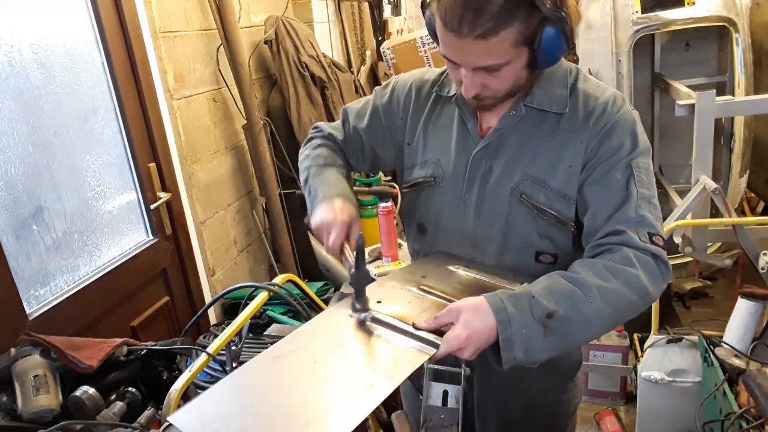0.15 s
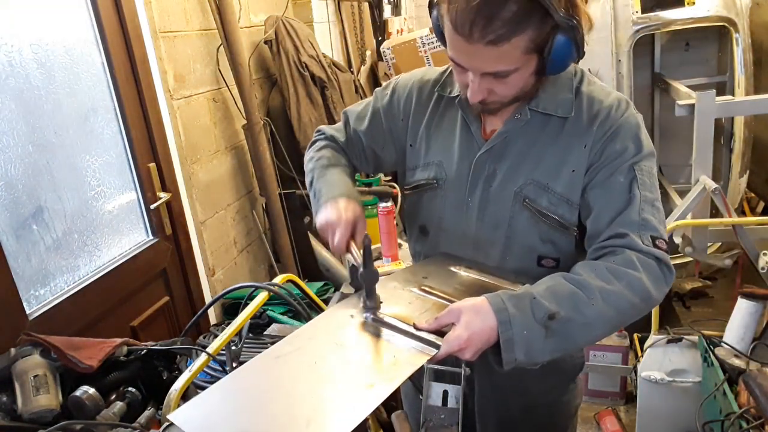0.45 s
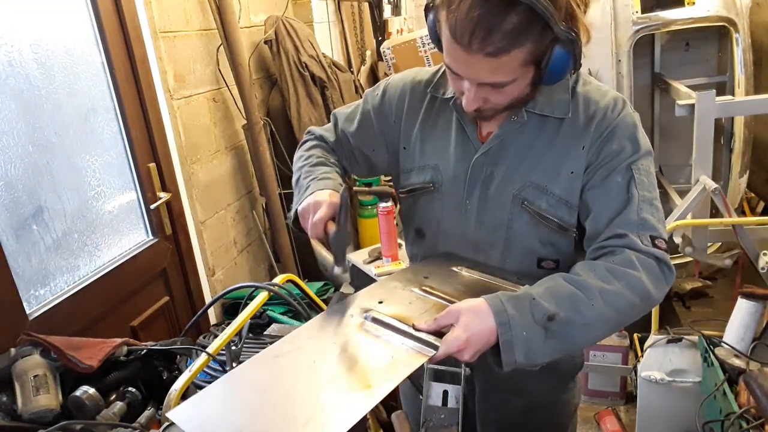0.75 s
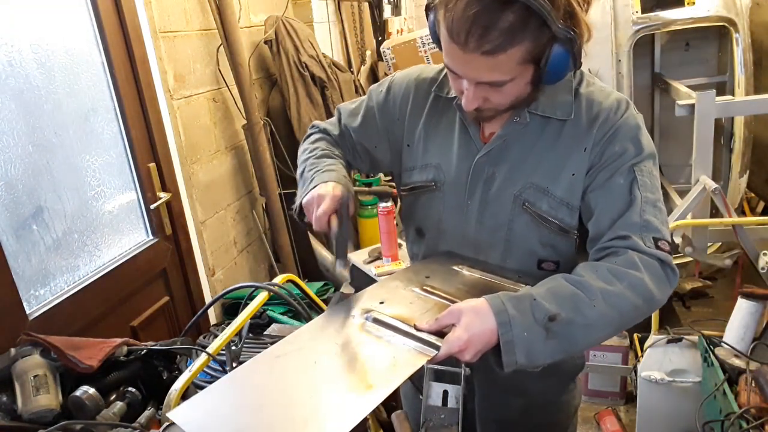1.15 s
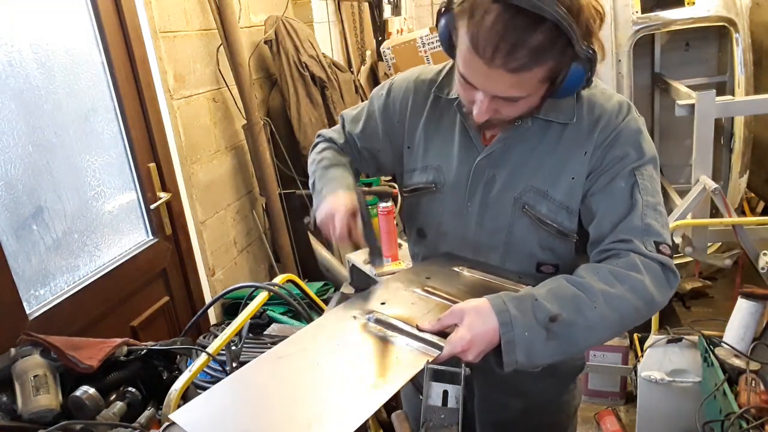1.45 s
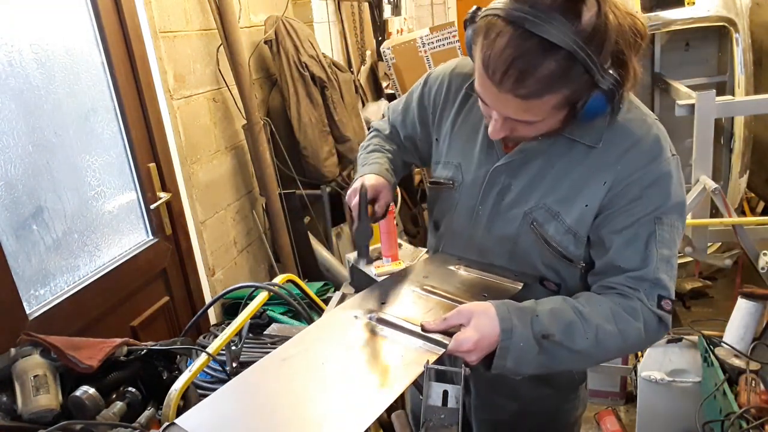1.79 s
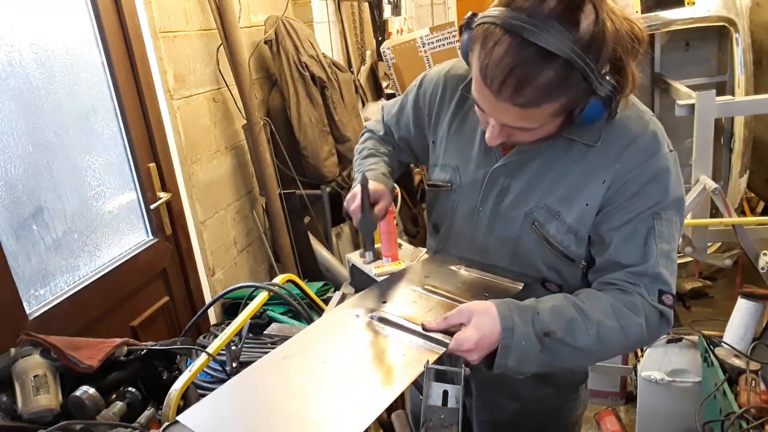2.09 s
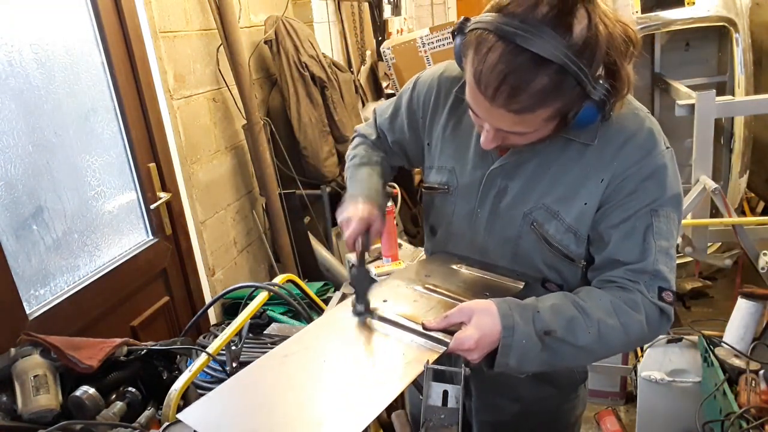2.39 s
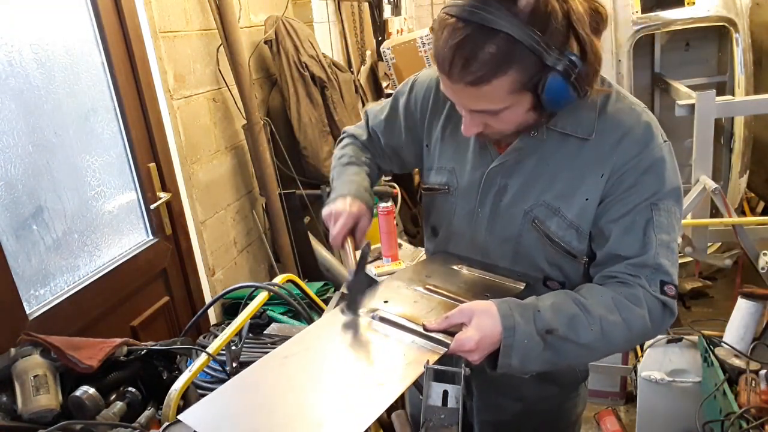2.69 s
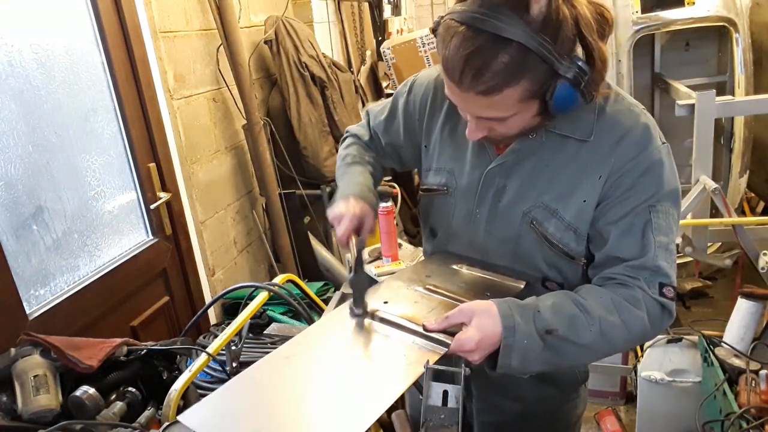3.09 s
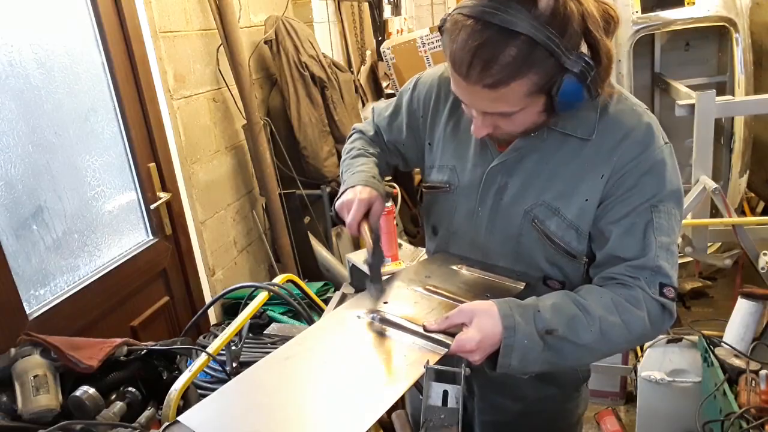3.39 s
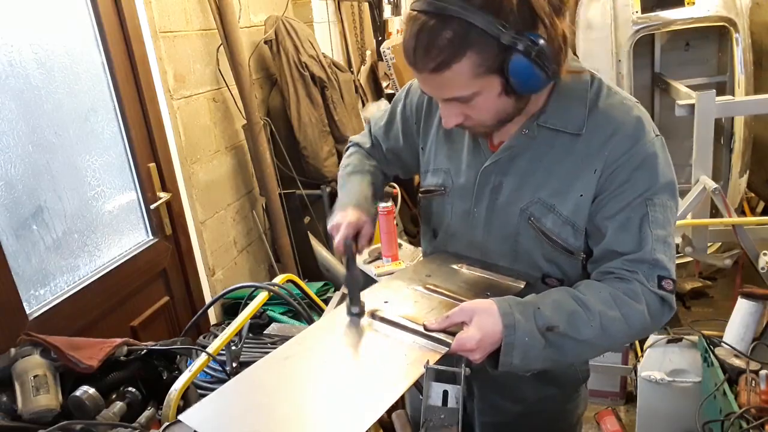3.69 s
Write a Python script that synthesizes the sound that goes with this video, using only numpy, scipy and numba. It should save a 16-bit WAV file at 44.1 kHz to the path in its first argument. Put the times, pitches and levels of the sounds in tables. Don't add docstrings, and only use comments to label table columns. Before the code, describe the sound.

A hand hammer beats sheet steel over a form tool in fast, even bursts, with a brief gap midway and a shorter one near the end; close, bright and bass-light, in a small dry workshop.

```python
import sys
import numpy as np
from scipy import signal
from scipy.io import wavfile
from scipy.ndimage import uniform_filter1d
from numba import njit

SR = 44100
rng = np.random.default_rng(int(sys.argv[2]) if len(sys.argv) > 2 else 0)


def field_ratio(decibels):
    return 10 ** (np.asarray(decibels, dtype=float) / 20)


def output_pcm(signal):
    pcm = np.clip(np.atleast_2d(signal).T, -1, 1) * 32767
    wavfile.write(sys.argv[1], SR, np.round(pcm).astype(np.int16))


N = 169785

# t/s, strength level/dB, thump level/dB, ring level/dB, knock f/Hz
BLOWS_A = [(0.1187, -13.5, -21, -5.5, 477), (0.2002, -11.5, -25.5, -14, 557),
           (0.2799, -13, -24.5, -12, 600), (0.351, -16, -25, -1, 790), (0.4245, -14.5, -22, -1.5, 725),
           (0.4955, -13.5, -24, -2.5, 580), (0.566, -14.5, -18, 1, 680), (0.6338, -13, -23, -4.5, 610),
           (0.7, -14.5, -22, 0, 574), (0.768, -15, -18.5, -5, 573), (0.8367, -13.5, -22, -4, 417),
           (0.903, -14.5, -24.5, -5, 540), (0.969, -13, -24.5, -6.5, 590), (1.0359, -11.5, -20.5, -4, 704),
           (1.104, -14.5, -21.5, -1, 570), (1.1703, -13.5, -19.5, -15, 576), (1.24, -13.5, -21, -12.5, 360),
           (1.3102, -14.5, -21.5, -16.5, 544), (1.3799, -14.5, -20, -4.5, 584),
           (1.4506, -13, -25.5, -7, 700), (1.5225, -16, -16.5, 3, 487)]
BLOWS_B = [(1.8772, -12, -22.5, -2, 624), (1.9514, -12, -19.5, -15, 695), (2.0241, -12, -25.5, -6, 816),
           (2.0961, -10.5, -25, -7.5, 360), (2.1677, -15, -21.5, -1.5, 514), (2.2374, -13, -23, -10, 433),
           (2.3064, -11.5, -26.5, -7, 656), (2.3756, -13, -25, -6.5, 464), (2.444, -13.5, -22, -7, 760),
           (2.5145, -13.5, -25, -8, 706), (2.5839, -13.5, -25, -3, 540), (2.6538, -13, -20, -5, 795),
           (2.7238, -13, -21.5, -3.5, 694), (2.794, -13.5, -23.5, 2.5, 550), (2.8625, -10, -25, -2, 686),
           (2.9312, -14.5, -25.5, 2.5, 840), (2.999, -12, -23.5, -4.5, 820), (3.0669, -14.5, -23, -4, 570),
           (3.1358, -12.5, -25.5, 0.5, 343), (3.2041, -14.5, -23, 1, 725), (3.2728, -14, -20, -3, 540),
           (3.3416, -12.5, -25, -4.5, 630), (3.4094, -14, -27.5, 2.5, 735), (3.4781, -14.5, -20, 0.5, 535)]
BLOWS_C = [
    (3.5986, -13.5, -19.5, -3.4, 465),
    (3.6765, -13, -22, -1.65, 730),
    (3.747, -14, -22.5, -1, 500),
]
# t/s, strength level/dB, thump level/dB, ring level/dB, knock f/Hz
LIGHT_TOUCHES = [
    (1.636, -62, -30, 3, 900),
    (1.81, -77, -24, 6, 900),
    (.082, -72, -30, 0, 900),
    (1.705, -82, -26, 2, 900),
]
# t/s, strength level/dB, thump level/dB, ring level/dB, knock f/Hz
PRIOR_BLOW = [
    (.001, -43, -34, 8, 500),
]
# t/s, level/dB, centre f/Hz, decay/s
STRAY_TICK = [
    (3.186, -12.5, 3200, 0.0017),
]
# f/Hz, level/dB, t60/s
TOOL_START = [(1766, -10, 0.6), (2638, -17, .15), (3740, -14, .1), (5066, -13, .1), (6142, -13, 0.14),
              (6304, -3, 0.19), (900, -22, .2), (8791, 0, 0.16), (11510, -7, 0.2), (11700, -17, 0.22),
              (15470, -12, 0.3)]
TOOL_A = [(1755, -20, 0.3), (2277, -24, .26), (2616, -22, 0.26), (5895, -27, 0.26), (8786, -8, 0.3),
          (11630, -2, .22), (11690, 0, 0.29), (15500, -18, 0.13)]
TOOL_B = [(1814, -2, .22), (11670, -4, 0.3), (14990, 0, 0.15)]
TOOL_C = [(1696, 2, 0.39), (1825, -4, .29), (8780, -4, 0.6), (11660, -13, .7), (13220, -8, 0.3),
          (14970, -6, 0.35)]
LONGEST_T60_S = [.6, .25, .3, .7]
# f/Hz, level/dB, t60/s
TOUCH_MODES = [(877, 0, .09), (1690, -2, .11), (3548, -11, .08), (4678, -6, .08), (6067, -11, .07),
               (8172, -6, .07), (11710, -10, .15), (13030, -6, .06)]
# f/Hz, level/dB, t60/s, best-answer t/s, span/s
PANEL_MODES = [(890, -5, .13, 1.2, 3), (990, -8, .13, 2, 3), (1640, -9, .14, 1.5, 3),
               (2520, -11, .14, 2, 3), (1690, -2, .18, .88, .3), (1685, -4, .18, 2.8, 1.2),
               (1760, -2, .2, .8, .4), (1825, -7, .2, 3.3, .5), (1992, 4, .07, .9, .6),
               (2608, -2, .17, .33, .2), (2605, -6, .17, 2.6, 1.6), (5065, -5, .15, 1.2, .5),
               (5062, -7, .15, 2.1, .4), (5060, -7, .15, 3, .3), (5890, -4, .17, 2.6, .9),
               (6304, 0, .2, .3, .35), (6300, -4, .17, 1.2, .28), (8785, -4, .22, 2.6, 1.6),
               (8787, -2, .22, .95, .5), (9190, -5, .13, 2.8, .5), (10390, 2, .25, 2.45, .42),
               (11246, -3, .12, 2.5, 2), (11690, -6, .2, 2.2, 1.2), (12545, 2, .11, 1.2, 2.5),
               (13080, 0, .15, 2.7, 1), (13480, -2, .14, 2.95, .4), (14830, 0, .13, .9, .35),
               (14980, -1, .17, .95, .3), (14980, -2, .17, 2.7, 1.3), (15519, 1, .14, .7, .6),
               (15519, -1, .14, 2.5, 1.1)]
# f/Hz, level/dB per Hz
SHEET_SPECTRUM = [(35, -69), (60, -38.5), (396, 2.5), (1100, -3.5), (1680, -2.5), (2120, -4), (4260, -6),
                  (13000, -2), (15700, -2)]
# f/Hz, t60/s
SHEET_DAMPING = [(100, 0.068), (500, 0.026), (1500, 0.076), (4000, 0.07), (9000, 0.088), (15000, 0.091)]
# f/Hz, level/dB
BENCH_SPECTRUM = [(300, -27), (700, -17), (1100, -6), (2000, 0), (4000, -8), (9000, -10), (15500, -12)]

SHEET_DB, SHEET_SCATTER_DB = 9, 0
SHEET_UNEVEN_DB, SHEET_T60_SPREAD_DB = 2.5, 1.0
PATCH_DB = 2
THUMP_HZ, THUMP_REF_DB, THUMP_LATE_S = 1018, -20, 0.002
KNOCK_DB, KNOCK_WIDTH_LOG_HZ = 4.5, 0.16
CHATTER_S, CHATTER_DB, CHATTER_FADE_DB = 0.0082, -4, -4
CRACK_DB, CRACK_S = -14, 0.0026
TOOL_DB = (-0.5, -13, -24, -20)
TOUCH_RING_DB = -5
PANEL_DB, PANEL_SCATTER_DB, PANEL_FADE_DB = -13, 2, 18
TWIN_HZ, DETUNE_HZ = 30, 8
KEPT = .5
BENCH_DB, BENCH_T60_S = -20, .22
ROOM_DB, ROOM_T60_S, ROOM_HZ, ROOM_TOP_HZ = -26, 0.15, 700, 5000
FLOOR_DB = -104
BASS_CUT_HZ, TOP_HZ = 184, 15750
LIMIT_DB, RATIO, ATTACK_S, RELEASE_S = -12.5, 6.8, 0.00031, 0.0085
CLIP = .75


@njit
def ring(at, kicks, poles, size, kept):
    out = np.zeros(size)
    for m in range(kicks.shape[1]):
        z = 0j
        for k in range(len(at)):
            z, p = z * kept + kicks[k, m], poles[k, m]
            end = at[k + 1] if k + 1 < len(at) else size
            for i in range(at[k], end):
                out[i] += z.imag
                z *= p
            if abs(z) < 1e-12:
                z = 0j
    return out


@njit
def follow(x, up, down):
    e, out = 0., np.empty(len(x))
    for i in range(len(x)):
        e += (abs(x[i]) - e) * (up if abs(x[i]) > e else down)
        out[i] = e
    return out


def strike(times_s, db, hz, t60_s, scatter_db, kept=0.86, detune_hz=0.):
    order = np.argsort(times_s)
    chance = rng.standard_normal((len(times_s), 4, len(hz)))
    phase = np.arctan2(chance[:, 1], chance[:, 2])
    kicks = field_ratio(db + scatter_db * chance[:, 0]) * np.exp(1j * phase)
    tuned_hz = hz + detune_hz * chance[:, 3]
    decay = np.log(1000) / (np.clip(t60_s, .01, 2) * SR)
    poles = np.exp(2j * np.pi * tuned_hz / SR - decay)
    at = (times_s[order] * SR).astype(np.int64)
    return ring(at, kicks[order], poles, N, kept)


def along(table, hz):
    table = np.array(table, float)
    return np.interp(np.log(hz), np.log(table[:, 0]), table[:, 1])


def bandpass(x, low_hz, high_hz, order):
    sos = signal.butter(order, [low_hz, high_hz], "band", fs=SR, output="sos")
    return signal.sosfilt(sos, x)


def workshop(x):
    t = np.arange(SR // 2) / SR
    tail = rng.standard_normal(len(t)) * field_ratio(-60 * t / ROOM_T60_S) * (t > .004)
    tail = bandpass(tail, ROOM_HZ, ROOM_TOP_HZ, 1)
    tail = tail / np.sqrt(np.sum(tail ** 2))
    return signal.fftconvolve(x, tail)[:N] * field_ratio(ROOM_DB)


def bench(blows, count=380):
    hz = 120 + 15580 * rng.random(count) ** 1.5
    own_db = 4 * rng.standard_normal(count)
    t60_s = BENCH_T60_S * field_ratio(1.2 * rng.standard_normal(count))
    db = blows[:, 1:2] + along(BENCH_SPECTRUM, hz) + own_db
    db = db + BENCH_DB - 10 * np.log10(count / 2)
    return strike(blows[:, 0], db, hz, t60_s, 4)


def tick():
    out, t = np.zeros(N), np.arange(800) / SR
    for s, db, hz, decay_s in STRAY_TICK:
        noise = bandpass(rng.standard_normal(800), hz / 2, hz * 2, 2)
        start = int(s * SR)
        out[start:start + 800] += field_ratio(db) * noise * 2 * t / decay_s * np.exp(-t / decay_s)
    return out


def modes(blows, table, db, scatter_db, longest_s, twin_db=-11):
    db = np.tile(db + np.zeros((len(blows), len(table))), 3)
    table = np.tile(np.array(table, float), (3, 1))
    twins = np.arange(len(table)) >= len(table) // 3
    hz = table[:, 0] + twins * TWIN_HZ * rng.standard_normal(len(table))
    t60_s = np.minimum(table[:, 2], longest_s) * (1 - 0.18 * twins)
    db = blows[:, 1:2] + blows[:, 3:4] + table[:, 1] + db + twin_db * twins
    return strike(blows[:, 0], db, hz, t60_s, scatter_db, KEPT, DETUNE_HZ)


def touch_ring(touches):
    return modes(touches, TOUCH_MODES, TOUCH_RING_DB, 2, 1)


def tool_ring(runs):
    out = np.zeros(N)
    tables = (TOOL_START, TOOL_A, TOOL_B, TOOL_C)
    for run, table, db, longest_s in zip(runs, tables, TOOL_DB, LONGEST_T60_S):
        out += modes(run, table, db, 2.5, longest_s)
    return out


def panel(blows):
    table = np.array(PANEL_MODES)
    away = (blows[:, :1] - table[:, 3]) / table[:, 4]
    db = PANEL_DB - PANEL_FADE_DB * np.tanh(away ** 4)
    return modes(blows, table[:, :3], db, PANEL_SCATTER_DB, 1, twin_db=-6)


def crack(blows):
    out, t = np.zeros(N), np.arange(400) / SR
    noise = np.diff(rng.standard_normal((len(blows), 401)), axis=1)
    for (s, db, *_), n in zip(blows, noise):
        start = int(s * SR)
        out[start:start + 400] += field_ratio(db + CRACK_DB) * n * np.exp(-t / CRACK_S)
    return out


def chatter(blows, bounces):
    luck = rng.random((len(blows), 2, bounces))
    rows = []
    for k in range(1, bounces + 1):
        late = blows + [0, CHATTER_DB + CHATTER_FADE_DB * k, -5 * k, 0, 0]
        late[:, 0] += CHATTER_S * (k - .7 * luck[:, 0, k - 1])
        late[:, 1] -= 5 * luck[:, 1, k - 1]
        rows.append(late)
    return rows


def sheet(blows, touches, count=600, bounces=3):
    hz = 60 + (np.arange(count) + rng.random(count)) * (16000 - 60) / count
    rows = np.vstack([blows, touches] + chatter(blows, bounces))
    patch = uniform_filter1d(rng.standard_normal((len(blows), count)), size=16, axis=1)
    patch = patch * np.sqrt(16) * PATCH_DB
    patch = patch + SHEET_UNEVEN_DB * rng.standard_normal(patch.shape)
    patch = np.vstack([patch, np.zeros((len(touches), count))] + [patch] * bounces)
    low = 1 / (1 + (hz / THUMP_HZ) ** 4)
    thump_db = (rows[:, 2:3] - THUMP_REF_DB) * low
    knock_db = KNOCK_DB * np.exp(-(np.log(hz / rows[:, 4:]) / KNOCK_WIDTH_LOG_HZ) ** 2)
    db = rows[:, 1:2] + thump_db + knock_db + patch * (1 - low)
    db = db + along(SHEET_SPECTRUM, hz) + SHEET_DB - 10 * np.log10(count / 2)
    t60_s = along(SHEET_DAMPING, hz) * field_ratio(SHEET_T60_SPREAD_DB * rng.standard_normal(count))
    deep = hz < THUMP_HZ
    knocks = strike(rows[:, 0], db[:, deep], hz[deep], t60_s[deep], SHEET_SCATTER_DB)
    knocks = np.roll(knocks, int(THUMP_LATE_S * SR))
    return knocks + strike(rows[:, 0], db[:, ~deep], hz[~deep], t60_s[~deep], SHEET_SCATTER_DB)


def scene():
    runs = [np.array(r, float) for r in (PRIOR_BLOW, BLOWS_A, BLOWS_B, BLOWS_C)]
    prior, blows = runs[0], np.vstack(runs[1:])
    touches = np.array(LIGHT_TOUCHES, float)
    soft = np.vstack([touches, prior])
    shaken = soft + [0, 16, 0, 0, 0]
    shaken[:-1, 1] += touches[:, 3]
    dry = sheet(blows, soft) + crack(blows) + panel(blows) + tick()
    dry = dry + touch_ring(touches)
    dry = dry + bench(np.vstack([blows, shaken]))
    dry = dry + tool_ring(runs)
    room = workshop(dry)
    floor = field_ratio(FLOOR_DB) * rng.standard_normal(N)
    return (dry + room + floor)[None]


def band_limit(x):
    return signal.sosfilt(signal.butter(12, 17140, fs=SR, output="sos"), x)


def record(dry):
    x = signal.sosfilt(signal.butter(2, BASS_CUT_HZ, "high", fs=SR, output="sos"), dry)
    level = follow(x[0], 1 / (ATTACK_S * SR), 1 / (RELEASE_S * SR))
    level = np.roll(level, -24) + 1e-9
    x = x * np.minimum(1, field_ratio(LIMIT_DB) / level) ** (1 - 1 / RATIO)
    x = CLIP * np.tanh(x / CLIP)
    cut = signal.sosfilt(signal.ellip(10, .2, 60, TOP_HZ, fs=SR, output="sos"), x)
    loud = np.minimum(1, level / field_ratio(LIMIT_DB)) ** 2
    x = cut + field_ratio(-14.0) * loud * bandpass(x, 15900, 16700, 2)
    x = signal.sosfilt(signal.ellip(8, .2, 50, 16750, fs=SR, output="sos"), x)
    return band_limit(x)


dry = scene()
out = record(dry)
output_pcm(out)
```